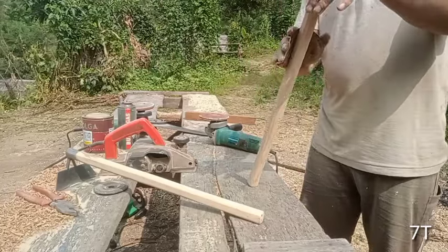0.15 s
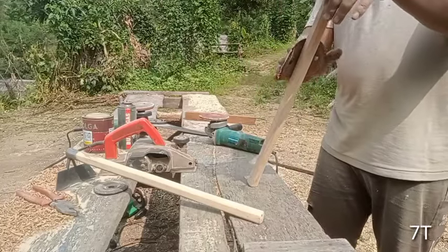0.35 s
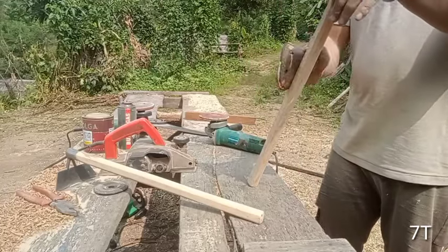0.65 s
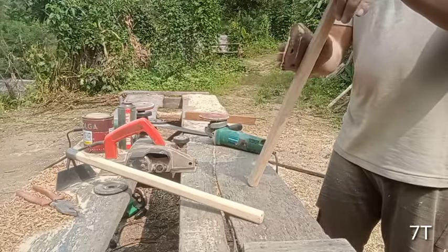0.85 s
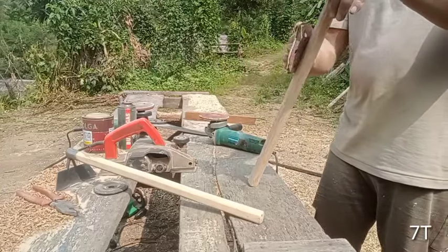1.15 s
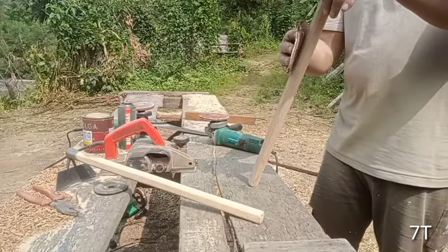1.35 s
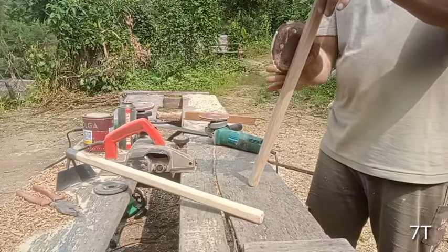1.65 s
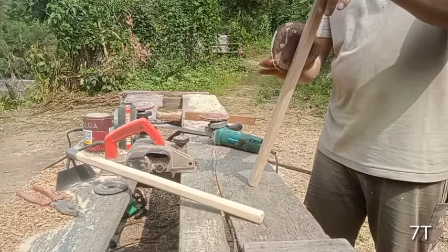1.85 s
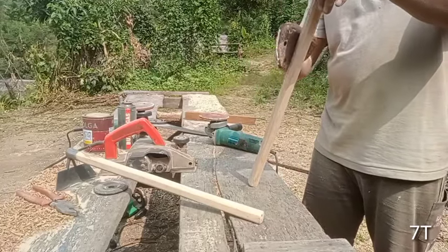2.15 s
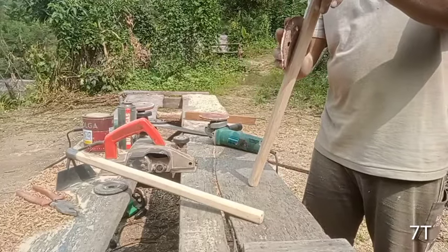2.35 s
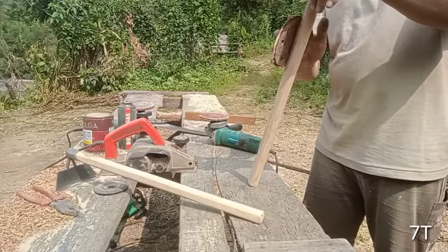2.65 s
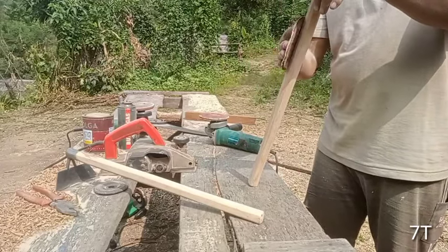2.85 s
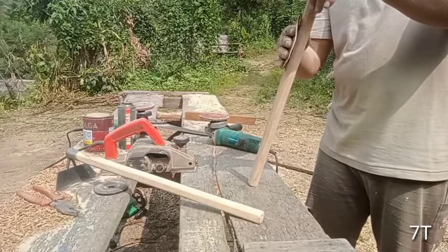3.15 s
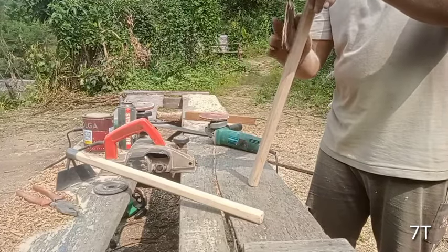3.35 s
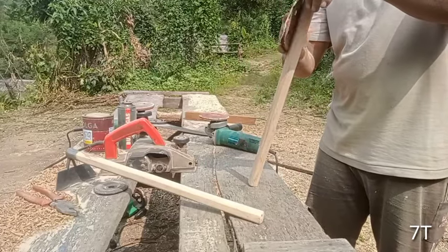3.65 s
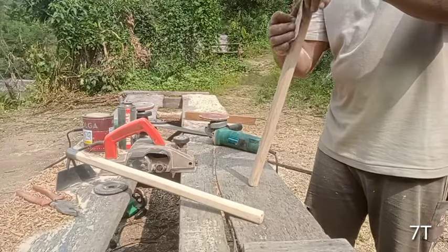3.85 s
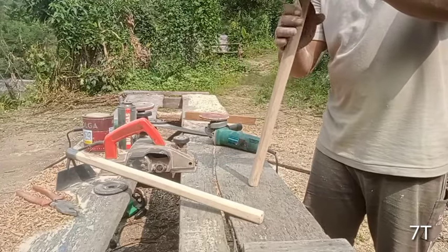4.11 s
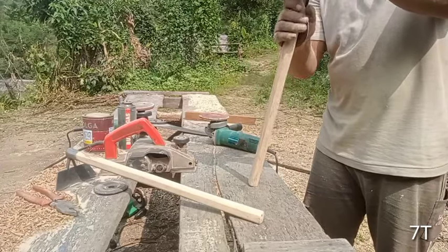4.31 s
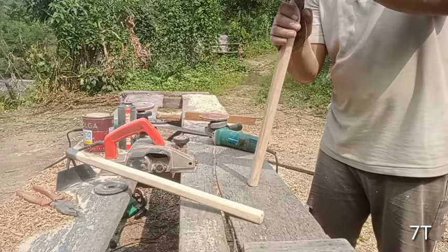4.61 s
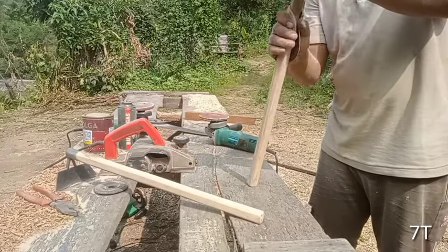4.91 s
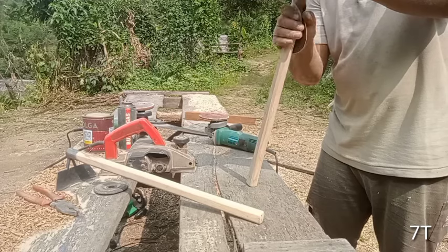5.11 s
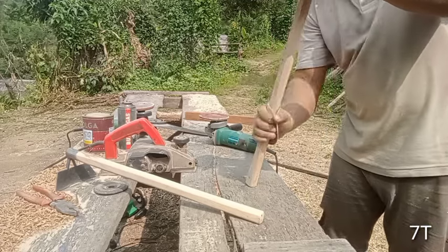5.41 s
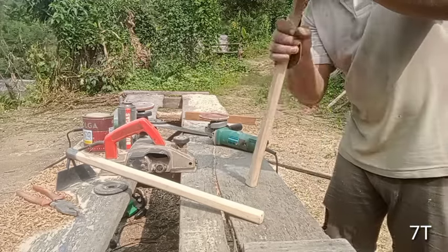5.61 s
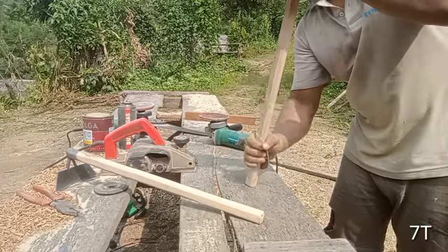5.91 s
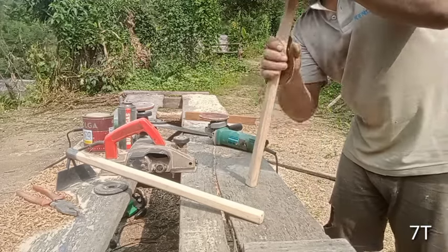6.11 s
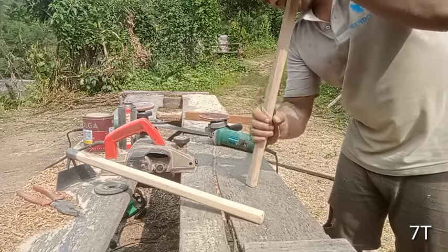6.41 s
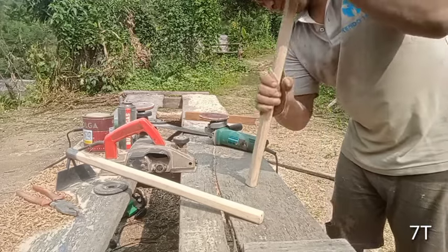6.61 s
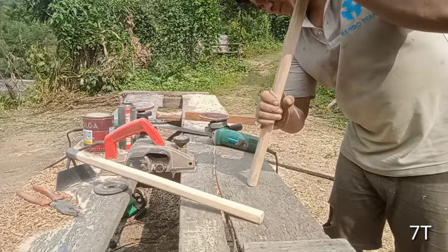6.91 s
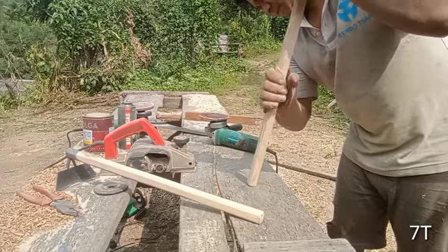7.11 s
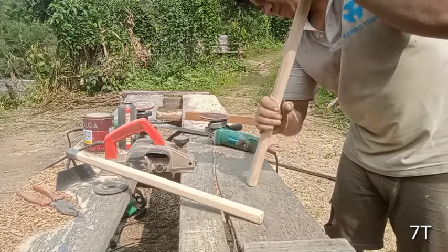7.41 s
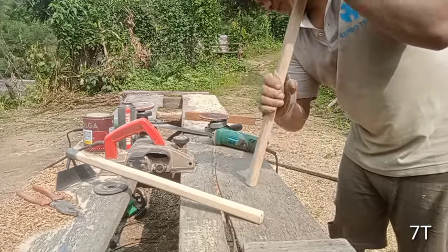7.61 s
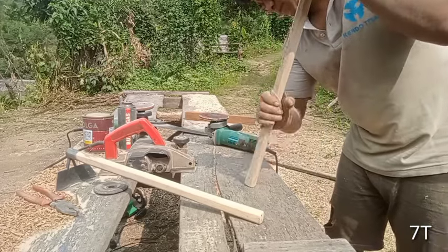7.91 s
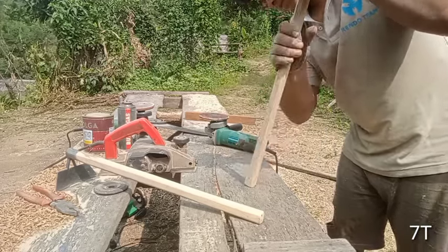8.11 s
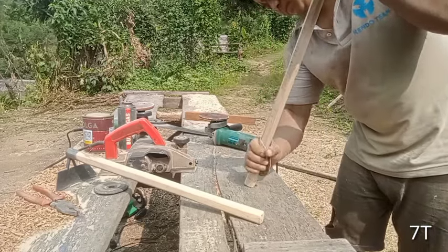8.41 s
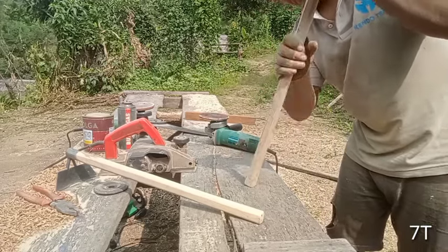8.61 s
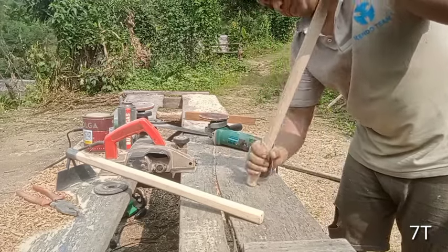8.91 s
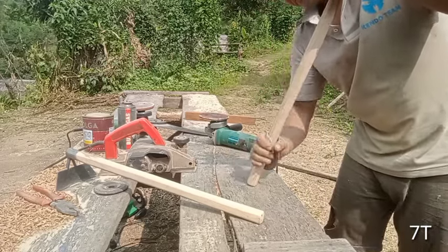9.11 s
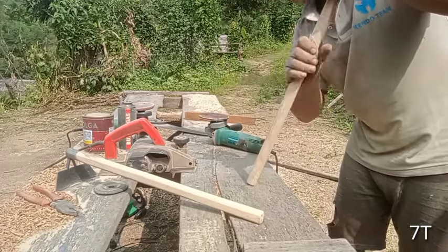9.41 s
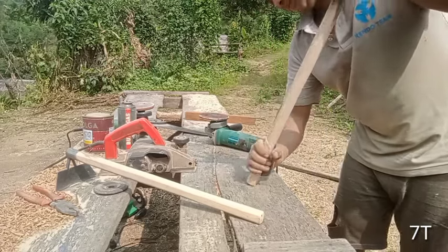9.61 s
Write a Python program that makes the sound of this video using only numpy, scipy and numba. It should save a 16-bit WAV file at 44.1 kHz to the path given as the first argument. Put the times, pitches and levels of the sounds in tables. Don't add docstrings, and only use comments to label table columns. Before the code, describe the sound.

Outdoors, light ticks and rustles, a few ringing taps on a wooden handle, then brisk gritty sanding strokes by hand with hard wooden knocks.

```python
import sys
import numpy as np
from scipy import signal
from scipy.io import wavfile
from numba import njit

SR = 44100
rng = np.random.default_rng(int(sys.argv[2]) if len(sys.argv) > 2 else 0)


def bounce(signal):
    frames = np.transpose(np.atleast_2d(signal))
    limited = np.clip(frames, -1, 1)
    pcm = np.round(limited * 32767).astype(np.int16)
    wavfile.write(sys.argv[1], SR, pcm)


def amplitude_ratio(level_db):
    exponent = np.asarray(level_db, float) / 20
    return 10 ** exponent


N = 429975
TIME = np.arange(N) / SR


def rms_one(x):
    return x / np.sqrt(np.mean(x ** 2) + 1e-20)


def at_hz(points, hz):
    points = np.array(points)
    return np.interp(np.log(hz), np.log(points[:, 0]), points[:, 1])


def drift(rate_hz):
    r = np.exp(-80 * np.pi * rate_hz / SR)
    noise = rng.standard_normal(N // 40 + 2002)
    slow = signal.lfilter([1], [1, -2 * r, r * r], noise)[2000:]
    return np.interp(np.arange(N) / 40, np.arange(len(slow)), rms_one(slow))


def band_pass(x, low_hz, high_hz):
    return signal.sosfilt(signal.butter(2, [low_hz, high_hz], "band", fs=SR, output="sos"), x)


def bands(source):
    edges_hz = 30 * 2 ** np.arange(0, 9.2, 1 / 3)
    for k, (low, high) in enumerate(zip(edges_hz, edges_hz[1:])):
        yield np.sqrt(low * high), band_pass(source[k % 2], low, high)


def ring(clicks, hz, t60_s):
    r, w = amplitude_ratio(-60 / (t60_s * SR)), 2 * np.pi * hz / SR
    return signal.lfilter([0, np.sin(w)], [1, -2 * r * np.cos(w), r * r], clicks + 1e-18)


@njit
def moving_peak(x, turn, r):
    y = np.zeros(len(x))
    for i in range(2, len(x)):
        driven = (1 - r * r) / 2 * (x[i] - x[i - 2])
        y[i] = driven + 2 * r * np.cos(turn[i]) * y[i - 1] - r * r * y[i - 2]
    return y


def peak(x, hz, width_hz):
    return moving_peak(x, 2 * np.pi * hz / SR * np.ones(N), np.exp(-np.pi * width_hz / SR))


def air():
    # hz, level_db
    hiss_curve = [(18, -42), (30, 4.5), (189, -3), (1160, -16.5), (3060, -12), (5740, -24), (9460, -32),
                  (16000, -40.5)]
    noise = rng.standard_normal((2, N))
    hiss = sum(band * amplitude_ratio(at_hz(hiss_curve, hz) + 1.2 * drift(3.6)) for hz, band in bands(noise))
    return amplitude_ratio(-56 - 8.5) * rms_one(hiss)


def cricket():
    # start_s, end_s, level_db
    trills = [
        (.255, .58, -74),
        (1.1, 1.37, -74),
        (2.25, 2.32, -71),
        (2.45, 2.485, -68),
        (3.435, 3.61, -69),
        (4.38, 4.415, -66),
    ]
    pitch_hz, strokes_per_s = 6500, 28.5
    level = 0
    for start, end, db in trills:
        strokes = np.sin(np.pi * strokes_per_s * (TIME - start)) ** 4
        level = level + amplitude_ratio(db) * (TIME > start) * (TIME < end) * strokes
    return level * amplitude_ratio(3.1 * drift(6.8)) * np.sin(2 * np.pi * pitch_hz * TIME)


def squeaks():
    # time_s, pitch_hz, level_db
    glides = [
        [(3.16, 2050, -69), (3.18, 1880, -66), (3.24, 1800, -70)],
        [(3.37, 1840, -66), (3.47, 1810, -64)],
        [(3.77, 2200, -65), (3.8, 2030, -66), (3.84, 2080, -66), (3.86, 2450, -63), (3.89, 2550, -65)],
        [(3.95, 2700, -72), (4.01, 2100, -66)],
    ]
    out = np.zeros(N)
    for rows in glides:
        s, hz, db = np.transpose(rows)
        pitch_hz = np.interp(TIME, s, hz) * (1 + .012 * drift(120))
        phase = 2 * np.pi * np.cumsum(pitch_hz) / SR
        level = amplitude_ratio(np.interp(TIME, s, db, -120, -120) + 2.0 * drift(50))
        out += level * (.45 * np.sin(phase) + np.sin(2 * phase))
    return out


def hub():
    # start_s, level_db, held_until_s
    songs = [
        (2.822, -65, 3.0),
        (3.252, -63, 3.42),
        (3.65, -60, 3.87),
        (4.033, -60, 4.185),
    ]
    pitch_hz, t60_s = 6790, .9
    level = 0
    for start, db, end in songs:
        fingers = ((end - TIME) / .015).clip(0, 1)
        level = level + amplitude_ratio(db - 60 * (TIME - start).clip(0) / t60_s) * (TIME > start) * fingers
    return level * amplitude_ratio(2.5 * drift(40)) * np.sin(2 * np.pi * pitch_hz * TIME)


def bumps():
    # time_s, peak_db, pitch_hz
    pushes = [(0.027, -41.5, 232), (0.425, -39.5, 191), (0.579, -43.5, 440), (0.708, -40, 196),
              (0.98, -39, 333), (1.552, -47, 370), (1.783, -50, 490), (2.375, -25, 500), (2.409, -43, 111),
              (2.5, -44, 197), (2.564, -42, 237), (4.311, -34, 207), (4.653, -24, 174), (4.699, -32, 100),
              (4.758, -36.5, 198), (4.9, -42, 110), (5.333, -26, 202), (6.488, -23.5, 228),
              (7.378, -20, 132), (7.479, -29.5, 163), (7.851, -25.5, 167), (7.943, -29.5, 174),
              (8.553, -28.5, 163), (9.508, -29.5, 192)]
    out, t = np.zeros(N), TIME[:SR // 4]
    for s, db, hz in pushes:
        push = rng.standard_normal(len(t)) * (t / .012) * np.exp(-t / 0.014)
        bump = ring(np.gradient(push), hz, 15.0 / hz)
        start = round(s * SR) - 300
        out[start:][:len(t)] += amplitude_ratio(db - 2.0) * bump[:N - start] / np.abs(bump).max()
    return out


def ticks():
    # time_s, peak_db, pitch_hz
    edge_ticks = [(0.0226, -36, 2800), (0.0837, -42, 3100), (0.282, -48, 1930), (0.5783, -43.5, 2530),
                  (0.7008, -34.5, 1920), (0.7597, -54, 3470), (0.817, -42.5, 3130), (0.8298, -42, 1870),
                  (0.9737, -31.5, 1870), (0.982, -34, 1900), (0.991, -30, 2240), (1.001, -32, 2860),
                  (1.011, -32, 3600), (1.501, -52, 3280), (1.7908, -57, 2800), (2.1145, -45, 1680),
                  (2.538, -51, 9460), (2.58, -37.5, 2410), (3.103, -51, 2370), (3.1205, -45, 2380),
                  (3.576, -45, 2850), (3.604, -43.5, 2880), (3.7718, -38.5, 2280), (4.0194, -32, 2540),
                  (4.185, -33, 3100), (4.208, -34.5, 3270), (4.2213, -26, 3940), (4.2436, -31.5, 3800),
                  (4.3096, -42.5, 3120)]
    # time_s, peak_db, pitch_hz
    snags = [
        (4.8046, -52, 2570),
        (4.917, -50, 2720),
        (5.21, -18, 2840),
        (5.9147, -25, 2820),
        (5.9352, -17, 3460),
        (6.103, -26, 3400),
        (7.3617, -28, 3520),
    ]
    out, t = np.zeros(N), TIME[:SR // 10]
    for s, db, hz in edge_ticks + snags:
        snap_and_rattle = amplitude_ratio(-60 * t / 0.0049) + 0.19 * amplitude_ratio(-60 * t / 0.075)
        snap = rng.standard_normal(len(t)) * snap_and_rattle
        high_pass = signal.butter(2, 0.51 * hz, "high", fs=SR, output="sos")
        tone = signal.sosfilt(high_pass, ring(snap, hz, 5.8 / hz))
        broad = band_pass(snap, 2000, 10500)
        tick = tone / np.abs(tone).max() + 0.38 * broad / np.abs(broad).max()
        out[round(s * SR):][:len(t)] += amplitude_ratio(db + 6.5) * tick
    return out


def knocks():
    # pitch_hz, level_db, t60_s
    handle_modes = [(274, -16.5, 0.32), (481.3, -6.5, 0.21), (754, -0.5, 0.11), (1003, -13.5, 0.19),
                    (1145, -9.5, 0.14), (1320, -11.5, 0.14), (1510, -28, 0.11), (2000, -26.5, 0.11),
                    (2150, -10, 0.12), (2230, -30.5, 0.25), (2330, -8, 0.07), (2610, -3, 0.11),
                    (2960, -13, 0.1)]
    # hz, level_db (per Hz)
    thud_curve = [(35, -58), (60, -17.5), (371, -13), (448, -3), (842, -6), (1090, -6.5), (2650, -13),
                  (6000, -27.5), (8710, -25.5), (16000, -41)]
    # hz, t60_s
    thud_t60 = [(100, 0.37), (700, 0.26), (3000, 0.17), (15000, 0.069)]
    # time_s, peak_db, ring_length_share, favoured_hz, clack_over_blow_db
    taps = [
        (0.699, -29.5, 0.46, 400, -10),
        (2.374, -28, 1.0, 511, -12),
        (2.82, -13, 1.0, 587, 5.5),
        (3.251, -6.5, 0.98, 756, -13.5),
        (3.65, -5, 0.92, 756, -13),
        (4.033, -3, 0.97, 738, -2.5),
        (4.826, -32.5, 0.83, 557, 7),
        (5.216, -3.5, 0.98, 795, -13),
    ]
    foot_knocks = [
        (0.973, -24, 0.5, 630, -2),
        (6.191, -3.5, 0.87, 580, -18),
        (6.511, -5, 0.88, 784, -25),
        (7.37, -3.5, 0.35, 854, 3),
        (7.855, -25, 0.5, 804, 7),
    ]
    tap_crack_db, foot_crack_db, crack_lag = -13.5, -18, 0.46
    out, thud = np.zeros(N), list(bands(rng.standard_normal((2, N))))
    thud_rms = np.sqrt(sum(np.mean(band ** 2) * amplitude_ratio(2 * at_hz(thud_curve, hz)) for hz, band in thud))
    t = TIME[:SR // 2]
    blows = sorted([(*row, tap_crack_db) for row in taps] + [(*row, foot_crack_db) for row in foot_knocks])
    for s, db, share, favoured_hz, clack_db, crack_db in blows:
        crack_db = crack_db - crack_lag * db
        at, share = round(s * SR), np.clip(share, .2, 2)
        crack = band_pass(rng.standard_normal(len(t)), 2500, 10000)
        blow = amplitude_ratio(crack_db + 13.0 - 60 * t / 0.0041) * crack
        blow = blow + amplitude_ratio(clack_db - 60 * t / .016) * np.sin(2 * np.pi * favoured_hz * t)
        luck = rng.standard_normal((len(handle_modes), 3))
        for (hz, mode_db, t60_s), (luck_level, phase, luck_pitch) in zip(handle_modes, luck):
            place_db = 7.0 * np.exp(-(np.log(hz / favoured_hz) / .35) ** 2)
            strength = amplitude_ratio(0.58 * mode_db + place_db - 17.0 + 4.83 * luck_level)
            grip_hz = hz * (1 + .008 * luck_pitch)
            blow = blow + strength * amplitude_ratio(-60 * t / (t60_s * share)) * np.sin(2 * np.pi * grip_hz * t + phase)
        for hz, band in thud:
            bright_db = (crack_db + 11.0) * (hz > 1800)
            dying_db = -60 * t / (at_hz(thud_t60, hz) * share)
            level_db = at_hz(thud_curve, hz) + bright_db - 11.0 + dying_db
            blow = blow + band[at:at + len(t)] * amplitude_ratio(level_db) / thud_rms
        out[at:at + len(t)] += amplitude_ratio(db) * blow * (1 - np.exp(-t / 0.0011))
    return out


def grains(per_s, spread_db):
    uneven_db = spread_db * np.minimum(rng.exponential(1, (2, N)), 5)
    sizes = amplitude_ratio(uneven_db) * rng.choice([-1, 1], (2, N))
    return sizes * (rng.random((2, N)) < per_s / SR)


def dying(db, db_per_s):
    return np.maximum.accumulate(db + db_per_s * TIME) - db_per_s * TIME


def rub_controls():
    # start_s, length_s, grit_db, pressure_gained_along_it_db, wood_db
    down = [
        (4.927, 0.2, -36.5, 37.5, -40.5),
        (5.308, 0.2, -21.5, 27, -33.5),
        (5.77, 0.2, -21, 19.8, -31.5),
        (6.194, 0.225, -24, 33, -35),
        (6.678, 0.22, -21.5, 18, -33.5),
        (7.174, 0.24, -22.5, 6.5, -35),
        (7.661, 0.211, -23, 22.5, -36),
        (8.193, 0.291, -23.5, -4.5, -34),
        (8.815, 0.35, -27, -19, -36),
        (9.467, 0.29, -24, 15.5, -36),
    ]
    up = [
        (5.146, 0.16, -29.5, 6, -42.5),
        (5.579, 0.19, -23, -10, -36.7),
        (6.04, 0.2, -22, -11.5, -37),
        (6.479, 0.22, -23.5, -15.3, -35.5),
        (6.957, 0.24, -22, -5.5, -37.2),
        (7.462, 0.22, -23, -6, -37.5),
        (7.928, .276, -23, -8.7, -38.6),
        (8.541, .281, -23.5, 0, -38.5),
        (9.192, 0.31, -26, 2, -43.5),
    ]
    # loudest_s, fades_20_db_in_s, grit_db, fine_grit_db, wood_db
    shifts = [(.06, .3, -63, -71, -63.5), (.145, .1, -53.5, -61.5, -61), (.41, 0.1, -44, -59.5, -49),
              (.585, .07, -60, -77, -55), (.835, 0.3, -66, -76, -65), (1.04, 0.37, -59.5, -62, -59),
              (1.49, 1.1, -63, -72, -63.5), (1.64, -0.16, -58.5, -67, -59), (2.0, 0.4, -63.5, -72, -65.5),
              (2.12, -0.02, -58, -66, -55), (2.35, 1, -65.5, -71, -75), (2.48, 0.17, -66, -72, -54.5),
              (2.575, 0.1, -57.5, -69, -66), (3.115, .15, -61, -74, -60), (3.36, 0.24, -53.5, -63, -45),
              (3.46, .08, -56, -61, -49), (3.591, 0.2, -55, -69, -44.5), (3.8, 0.23, -58, -64.5, -55),
              (3.99, 1.8, -60, -74, -67), (4.22, .2, -46.5, -53, -43.5), (4.35, 0, -48, -63, -46),
              (4.67, .07, -40.5, -54.5, -41), (4.76, -2, -53, -71, -53.5), (4.831, 0.16, -37, -51.5, -36.5)]
    # time_s, hollow_hz
    loose_hollow = [(.15, 2200), (.45, 1900), (.6, 2550), (1.0, 2800), (3.0, 2650), (4.3, 3150),
                    (4.8, 2860)]
    grit_power, fine_power, wood_power, evenness = 2.08, 2.88, 0.65, 2.91
    fine_db, fine_bite, wood_bite = -28.5, 1.2, 0.35
    fine_at_foot_db, wood_at_foot_db = 1.5, 3
    levels = -76 + np.array([[0], [-14], [-3]]) + np.zeros(N)
    for rows, way in [(down, 1), (up, -1)]:
        for s, length, db, gained_db, stroke_wood_db in rows:
            on = slice(round(s * SR), round((s + length) * SR))
            along = (TIME[on] - s) / length - .5
            speed_db = 20 * np.log10((1 - np.abs(2 * along) ** evenness).clip(1e-9))
            press_db = gained_db * along
            towards_foot = way * along
            grit = db + press_db + grit_power * speed_db
            fine = fine_db + fine_bite * (db + 22 + press_db) + fine_power * speed_db
            wood = stroke_wood_db + wood_bite * press_db + wood_power * speed_db
            stroke = [grit, fine + fine_at_foot_db * towards_foot, wood + wood_at_foot_db * towards_foot]
            levels[:, on] = np.maximum(levels[:, on], stroke)
    levels = [dying(db, db_per_s) for db, db_per_s in zip(levels, [470, 470, 339])]
    levels = levels - sum(10 * np.exp(-((TIME - s - length) / 0.011) ** 2) for s, length, *_ in up)
    for s, fade, *db in shifts:
        near = slice(max(0, round((s - .15) * SR)), round((s + 2 * fade) * SR))
        rise_db, fall_db = 350 * (TIME[near] - s), 20 * (s - TIME[near]) / fade
        shape_db = np.minimum(rise_db, fall_db)
        levels[:, near] = np.maximum(levels[:, near], shape_db + np.array(db)[:, None])
    linger_s = .04
    at_top = [(row[0], 0) for row in down]
    leaves_foot = [(row[0] + linger_s, 1) for row in up[1:]]
    nears_foot = [(row[0] + row[1] - linger_s, 1) for row in down[1:]]
    first_turn = [(up[0][0], 0.24)]
    turns = sorted(at_top + leaves_foot + nears_foot + first_turn)
    top_hz, foot_hz = 2720, 3280
    rubbing_hz = top_hz + (foot_hz - top_hz) * np.interp(TIME, *np.transpose(turns))
    loose_hz = np.interp(TIME, *np.transpose(loose_hollow))
    return [*levels, np.where(TIME < down[0][0], loose_hz, rubbing_hz)]


def rub():
    # hz, level_db (per Hz)
    grit_curve = [(710, -44), (1200, -12), (1490, -31), (1790, -7), (3080, -4.5), (4130, -7.5),
                  (4750, -13.5), (6650, -13.5), (7410, -6), (9310, -11.5), (12300, -14), (14800, -15),
                  (16000, -30)]
    # pitch_hz, width_hz, level_db
    wood_modes = [(125.5, 65, -7), (209.4, 52.6, -1), (273.3, 12.4, -13.5), (466.6, 54, -0.5),
                  (534.7, 28, -5), (655, 105, -3.5), (815, 150, -4.5), (1147, 125, -6.5)]
    grit_db, fine_db, wood_db, hollow_hz = rub_controls()
    source = grains(per_s=5500, spread_db=2.0)
    clump_db = 1.0 + 0.027 * (-22 - grit_db).clip(0, 30)
    source = source * amplitude_ratio(clump_db * drift(53))
    grit, fine = 0, 0
    for hz, band in bands(source):
        band = band * amplitude_ratio(at_hz(grit_curve, hz) + 1.95 * drift(11.4))
        if 1300 < hz < 6500:
            grit = grit + band
        elif hz > 6500:
            fine = fine + band
    hollow_hz = 3000 * (hollow_hz / 3000) ** 1.6 * (1 + .04 * drift(12))
    for ratio, width_hz, gain in [(.8, 307, 0.67), (1.0, 400, 0.99), (1.28, 450, 0.76)]:
        grit = grit + gain * peak(grit, ratio * hollow_hz, width_hz)
    fine = fine + 1.74 * peak(fine, 9410, 1200)
    wood = 0
    for k, (hz, width_hz, db) in enumerate(wood_modes):
        mode = peak(peak(source[k % 2], hz, 1.46 * width_hz), hz, 1.46 * width_hz)
        wood = wood + amplitude_ratio(db + 1.4 * drift(12.3)) * mode / np.sqrt(width_hz)
    return amplitude_ratio(grit_db) * rms_one(grit) + amplitude_ratio(fine_db) * rms_one(fine) + amplitude_ratio(wood_db) * rms_one(wood)


def scene():
    background = air() + cricket()
    handling = squeaks() + hub() + bumps() + ticks()
    return np.tile(background + handling + knocks() + rub(), (2, 1))


def top_cut(x):
    return signal.sosfilt(signal.butter(12, 16480, fs=SR, output="sos"), x)


def record(dry):
    thin = signal.sosfilt(signal.butter(3, 78, "high", fs=SR, output="sos"), dry)
    rounded = .9 * np.tanh(thin / .9)
    finished = signal.sosfilt(signal.cheby2(12, 60, 16400, fs=SR, output="sos"), rounded)
    return top_cut(finished)


dry = scene()
out = record(dry)
bounce(out)
```